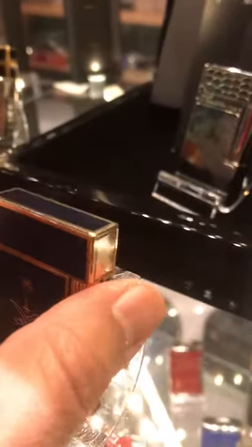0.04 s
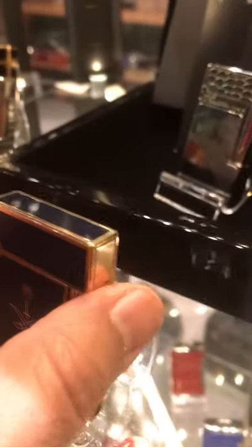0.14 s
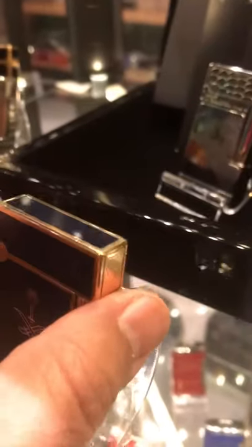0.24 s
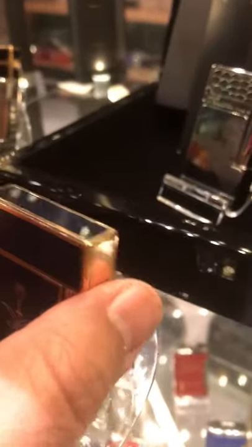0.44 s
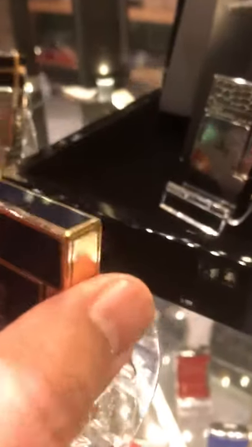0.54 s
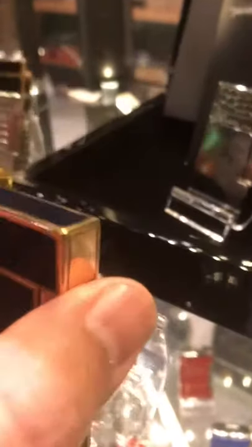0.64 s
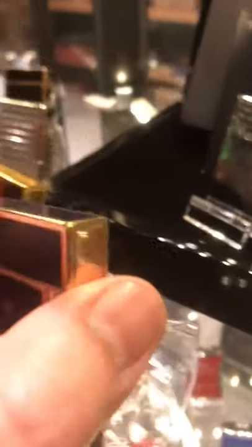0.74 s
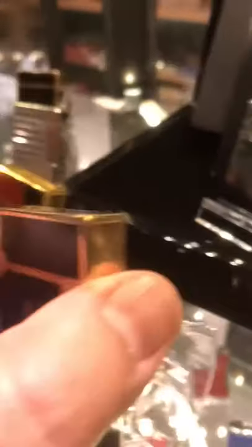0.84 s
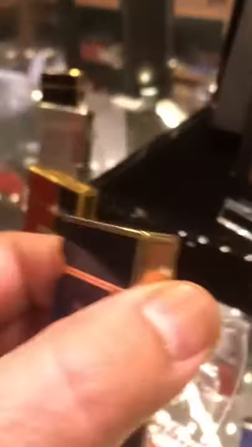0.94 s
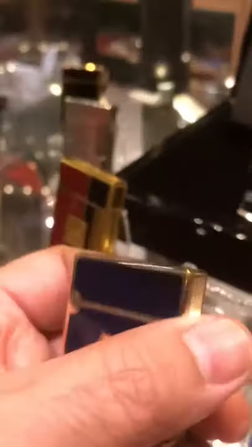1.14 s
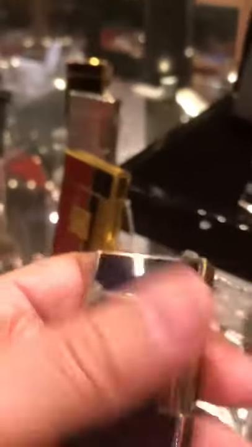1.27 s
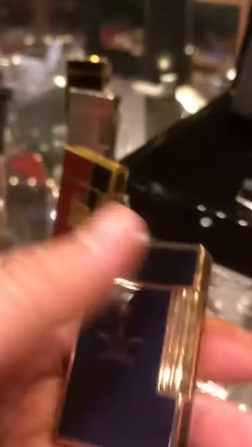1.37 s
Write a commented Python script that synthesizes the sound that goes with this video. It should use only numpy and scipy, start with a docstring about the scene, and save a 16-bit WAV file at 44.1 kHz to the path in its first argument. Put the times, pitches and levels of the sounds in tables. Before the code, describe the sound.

A metal flip-top lighter is thumbed open very close to the microphone: a sharp cluster of clicks, a bright short ring and tiny spring rattle, then faint hiss, over low ventilation hum in a shop.

```python
"""Ventilation hums and rumbles in a shop from the first moment to the last.
A metal flip-top lighter is thumbed open close by, over a glass counter: the catch snaps, the hinge knocks over,
the lid hits its stop and rings, then rattles on its spring; a thin hiss lingers. Contacts are clicks that set off
decaying sines and noise bursts; the counter rings, and banded noise gives the shop's short wash and faint tail.
The spring is a gated tone with narrow-band buzz, the ventilation wavering sines over banded noise."""
import sys
import numpy as np
from scipy import signal
from scipy.io import wavfile

SR = 44100
rng = np.random.default_rng(int(sys.argv[2]) if len(sys.argv) > 2 else 0)


def store_wav(level_fs):
    """Save 16-bit WAV to argv[1]."""
    pcm = np.round(np.clip(np.atleast_2d(level_fs), -1, 1) * 32767)
    wavfile.write(sys.argv[1], SR, pcm.T.astype(np.int16))


N = 63945
T = np.arange(N) / SR   # time axis [s]

# ventilation hum lines: (frequency [Hz], level [dB rms], level waver [dB], pitch wander [Hz])
HUM_LINES = [(63.5, -40.5, 3, 5.1), (100.66, -39, 0.57, 1.3), (122.4, -44, 4.5, 6.01),
             (199.7, -50.5, 0.5, 6), (511, -66, 2, 2.2), (609, -65, -0.5, 1.3), (724, -64.5, 4, 2.9)]
# rumble and air of the shop: (frequency [Hz], level per third octave [dB])
AIR_SPECTRUM = [(25, -68), (40, -44.5), (52, -48.5), (65, -46), (90, -45), (130, -43), (185, -46),
                (250, -58), (380, -62.5), (560, -61), (1200, -64), (2500, -68.5), (5000, -74.5),
                (9000, -79), (11000, -83), (14000, -77.5)]
# gain of the air above the rumble: (time [s], level [dB])
AIR_SWELL = [(0, 0), (.4, 0), (.8, -0.5), (1.1, 0), (1.45, 0)]
# contacts of the lid, each gain added to the levels of the response it drives:
# (time [s], knock [dB], case ring [dB], lid ring [dB], throw into the shop [dB])
LID_CONTACTS = [(0.2068, -40.5, -53, -51, -43), (0.2295, 0.5, 3.5, -24.5, 1), (0.2380, -6, -16, -25.5, -10),
                (0.2499, -1.5, -5, -24, -5), (0.2634, -11, -13, 1.5, -9), (0.2795, -15, -24.5, -29, -12),
                (0.301, -35, -34.5, -33, -27.5), (0.3078, -17, -27.5, -25, -22.5),
                (0.3338, -35, -39, -32.5, -20), (0.352, -35, -44, -41, -40)]
# dead knock of the hand-held body: (frequency [Hz], level [dB], t60 [s])
KNOCK_MODES = [(1600, -16, .016), (2672, -7, 0.012), (3410, -5.5, 0.016), (4150, -10, 0.02),
               (4830, -19, .022), (5350, -17.5, 0.017)]
# ring of the case, before the fingers damp it: (frequency [Hz], level [dB], t60 [s])
CASE_MODES = [(3474, -22, .06), (3790, -19.5, .06), (4790, -25, .07), (6024, -21.5, .07), (6611, -19, .07),
              (7720, -23, 0.085), (7820, -28.5, .06), (8940, -30, 0.059), (9300, -27.5, 0.074),
              (10440, -19, 0.06), (11060, -31, .05), (14010, -21, 0.064)]
# ring of the lid, before the fingers damp it: (frequency [Hz], level [dB], t60 [s])
LID_MODES = [(4268, -28.5, 0.15), (4577, -28.5, 0.045), (5170, -17, .07), (5650, -23, 0.02),
             (5986, -13.5, 0.079), (6290, -16.5, 0.072), (6690, -24.5, .04), (6692, -15.5, .07),
             (8710, -22.5, .07), (9211, -28, .05), (11030, -20.5, .04), (11250, -19.5, 0.06),
             (13490, -17.5, 0.045), (13850, -21.5, 0.016), (14022, -12.5, 0.054)]
# faint lasting ping of the open lid: (frequency [Hz], level [dB], t60 [s])
PING_MODES = [(5222, -56, 1.2), (6024, -56, .95), (6660, -56, .6), (8700, -61, .75), (9240, -67, .7),
              (11235, -58, .55)]
# resonances of the glass counter, before thinning: (frequency [Hz], level [dB], t60 [s])
COUNTER_MODES = [(549.4, -38.5, .3), (793, -29, 0.25), (1065.5, -30, .2), (1234, -36.5, .22),
                 (1387, -25, 0.21), (1433, -28.5, 0.35), (1567, -30, .2), (1840, -31.5, 0.35),
                 (2047, -35, 0.2), (2478, -25.5, 0.18), (2595, -32, 0.35), (2933, -29, .2),
                 (3100, -30, .22), (3107, -30.5, .22), (3610, -29.5, 0.24), (3870, -28.5, 0.37),
                 (4084, -27.5, .22), (4268, -31, 0.25)]
# scatter from the counter, before thinning: (frequency [Hz], level [dB], t60 [s])
SCATTER_BANDS = [(233, -42, .08), (380, -62, 0.068), (536, -37, .08), (1400, -22.5, 0.075),
                 (3300, -20.5, .055), (5200, -20, 0.054), (7500, -30, .05), (10000, -26, 0.061),
                 (14000, -39.5, .04)]
# short wash of the shop, before thinning: (frequency [Hz], level [dB], t60 [s])
WASH_BANDS = [(224, -54, .4), (390, -62, .3), (490, -43, 0.18), (800, -39.5, .6), (1400, -35.5, .45),
              (3300, -33.5, .33), (5500, -41, 0.64), (10000, -50.5, .24), (13990, -57.5, .24)]
# faint tail of the shop, before thinning: (frequency [Hz], level [dB], t60 [s])
TAIL_BANDS = [(500, -76, 1), (1500, -64.5, 1.6), (3450, -56.5, 1.9), (6000, -66.5, 1.15), (14000, -91, 1)]
# twangs of the hinge spring: (time [s], relative level [dB])
SPRING_TWANGS = [(0.3035, -1), (0.3092, 0), (0.3150, -9), (0.333, -7), (0.3810, -24)]

SWELL_ABOVE_HZ = 300
CRACK_DB, CRACK_T60_S, CRACK_LOW_HZ = -20.5, 0.02, 2500   # broadband edge of each contact
SIZZLE_DB, SIZZLE_T60_S, SIZZLE_LOW_HZ = -19.5, 0.0496, 4500   # the lid's crowd of weak high modes
DAMP_AFTER_S, DAMP_FADE_S, DAMP_DB = 0.014, 0.0054, -5.5   # fingers smother the ring after each contact
SCATTER_DELAY_S, WASH_DELAY_S, TAIL_DELAY_S = 0.0023, 0.006, 0.16
SCATTER_REACH_S, WASH_REACH_S, TAIL_REACH_S = 0.025, 0.091, 0.23   # beyond this, a quick thinning out
SPRING_HZ, SPRING_DB, SPRING_T60_S = 6621, -26.5, 0.031
SPRING_BUZZ_DB, SPRING_BUZZ_WIDTH_HZ = -30.5, 810
HISS_START_S, HISS_END_S, HISS_FADE_S = 0.33, 0.69, 0.019
HISS_DB, HISS_LOW_HZ = -65, 2970
CUTOFF_HZ = 15200


def from_db(db):
    """Decibels to gain."""
    return 10 ** (np.asarray(db) / 20)


def rms_one(x):
    """Scale to rms 1."""
    return x / np.sqrt(np.mean(x ** 2) + 1e-20)


def at_hz(table, hz):
    """Read a table's columns on a log-frequency axis."""
    freqs, *columns = np.transpose(table)
    return [np.interp(np.log(hz), np.log(freqs), column) for column in columns]


def dying(t60):
    """Exponential decay from time zero, down 60 dB after t60 seconds."""
    return np.exp(-np.log(1000) * T / t60)


def thinning(reach_s):
    """Gain that holds until the reach, then falls away."""
    return 1 / np.sqrt(1 + (T / reach_s) ** 8)


def drift(rate_hz):
    """Slow random wander of spread 1: noise through two equal low-pass poles, one point per 100 samples."""
    pole = np.exp(-2 * np.pi * rate_hz * 100 / SR)
    noise = rng.standard_normal(N // 100 + 2002)
    slow = signal.lfilter([1], [1, -2 * pole, pole ** 2], noise)[2000:]   # skip the filter's settling
    return np.interp(np.arange(N) / 100, np.arange(len(slow)), rms_one(slow))


def noise_bands():
    """Third-octave bands of unrelated noise, each of rms 1: (centre [Hz], noise)."""
    edges = 22.1 * 2 ** (np.arange(30) / 3)
    for low, high in zip(edges, edges[1:]):
        sos = signal.butter(3, [low, high], "band", fs=SR, output="sos")
        noise = signal.sosfilt(sos, rng.standard_normal(N + SR // 2))[-N:]
        yield np.sqrt(low * high), rms_one(noise)


def bright_noise(low_hz):
    """High-passed noise of rms 1."""
    sos = signal.butter(2, low_hz, "high", fs=SR, output="sos")
    return rms_one(signal.sosfilt(sos, rng.standard_normal(N)))


def ring(modes):
    """Response of a set of modes to one blow: decaying sines of alternating sign."""
    total = np.zeros(N)
    for k, (hz, db, t60) in enumerate(modes):
        total += (-1) ** k * from_db(db) * dying(t60) * np.sin(2 * np.pi * hz * T)
    return total


def strike(times, levels_db, response):
    """Play a response at every listed time and level."""
    clicks = np.zeros(N)
    clicks[np.round(times * SR).astype(int)] = from_db(levels_db)
    return signal.fftconvolve(clicks, response)[:N]


def ventilation():
    """Fan hum wavers in level and pitch over rumble and soft air noise."""
    swell = from_db(np.interp(T, *np.transpose(AIR_SWELL)))
    air = np.zeros(N)
    for hz, noise in noise_bands():
        band = from_db(at_hz(AIR_SPECTRUM, hz)[0]) * noise
        air += band * swell if hz > SWELL_ABOVE_HZ else band
    hum = np.zeros(N)
    for hz, db, waver_db, wander_hz in HUM_LINES:
        cycles = rng.random() + np.cumsum(hz + wander_hz * drift(5.93)) / SR
        line = from_db(waver_db * drift(8.9)) * np.sin(2 * np.pi * cycles)
        hum += from_db(db) * rms_one(line)
    return air + hum


def finger_damping():
    """Gain of the fingers' grip, which smothers a ring soon after the blow."""
    return from_db(DAMP_DB * np.clip((T - DAMP_AFTER_S) / DAMP_FADE_S, 0, 1))


def body_knock():
    """The held body answers with short, dead modes and a broadband crack."""
    crack = from_db(CRACK_DB) * dying(CRACK_T60_S) * bright_noise(CRACK_LOW_HZ)
    return ring(KNOCK_MODES) + crack


def lid_ring():
    """The lid's modes and sizzle are damped by the fingers, while a faint ping lasts."""
    sizzle = from_db(SIZZLE_DB) * dying(SIZZLE_T60_S) * bright_noise(SIZZLE_LOW_HZ)
    return finger_damping() * (ring(LID_MODES) + sizzle) + ring(PING_MODES)


def reflections(table, delay_s, reach_s):
    """Dense reflections set in after a delay, die band by band and thin out beyond their reach."""
    lowest_hz = table[0][0]
    echoes = np.zeros(N)
    for hz, noise in noise_bands():
        db, t60 = at_hz(table, hz)
        bass_loss = min(1, hz / lowest_hz) ** 2   # weaker below the table's lowest frequency
        echoes += from_db(db) * bass_loss * dying(t60) * noise
    return np.interp(T - delay_s, T, echoes * thinning(reach_s), left=0)


def shop_response():
    """The glass counter rings and scatters, then the shop gives its wash and tail."""
    counter = ring(COUNTER_MODES) * thinning(WASH_REACH_S)
    scatter = reflections(SCATTER_BANDS, SCATTER_DELAY_S, SCATTER_REACH_S)
    wash = reflections(WASH_BANDS, WASH_DELAY_S, WASH_REACH_S)
    tail = reflections(TAIL_BANDS, TAIL_DELAY_S, TAIL_REACH_S)
    return counter + scatter + wash + tail


def lighter():
    """Every contact knocks the body, rings case and lid, and stirs the counter and the shop."""
    times, knock_db, case_db, lid_db, shop_db = np.transpose(LID_CONTACTS)
    knock = strike(times, knock_db, body_knock())
    case = strike(times, case_db, finger_damping() * ring(CASE_MODES))
    lid = strike(times, lid_db, lid_ring())
    shop = strike(times, shop_db, shop_response())
    return knock + case + lid + shop


def spring():
    """The hinge spring rings on one note and buzzes against its seat, dying away after each twang."""
    times, levels_db = np.transpose(SPRING_TWANGS)
    envelope = strike(times, levels_db, dying(SPRING_T60_S))
    tone = np.sin(2 * np.pi * SPRING_HZ * T)
    b, a = signal.iirpeak(SPRING_HZ, SPRING_HZ / SPRING_BUZZ_WIDTH_HZ, fs=SR)
    buzz = rms_one(signal.lfilter(b, a, rng.standard_normal(N)))
    return envelope * (from_db(SPRING_DB) * tone + from_db(SPRING_BUZZ_DB) * buzz)


def hiss():
    """A faint even hiss of high-passed noise lingers after the snap, then stops."""
    gate = np.clip(np.minimum(T - HISS_START_S, HISS_END_S - T) / HISS_FADE_S, 0, 1)
    return from_db(HISS_DB) * gate * bright_noise(HISS_LOW_HZ)


def scene():
    """The lighter in front of the shop's hum, in mono."""
    return (ventilation() + lighter() + spring() + hiss())[None]


def record(dry):
    """The deepest bass is lost, the highest peaks are rounded and the top is cut."""
    bass_cut = signal.butter(6, 33, "high", fs=SR, output="sos")
    thinned = signal.sosfilt(bass_cut, dry)
    rounded = 0.95 * np.tanh(thinned / 0.95)
    top_cut = signal.ellip(8, 0.2, 90, CUTOFF_HZ, fs=SR, output="sos")
    return signal.sosfilt(top_cut, rounded)


dry = scene()
out = record(dry)
store_wav(out)
```